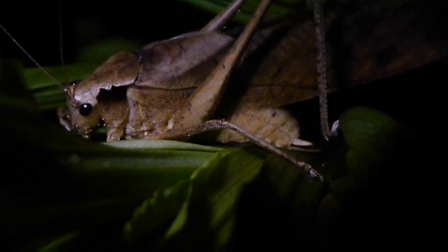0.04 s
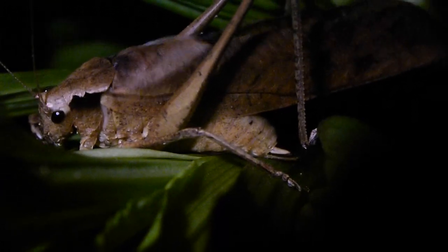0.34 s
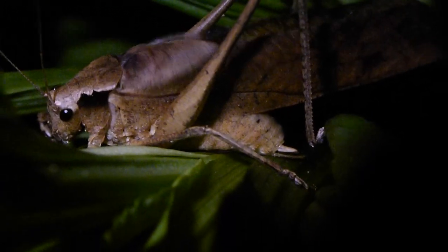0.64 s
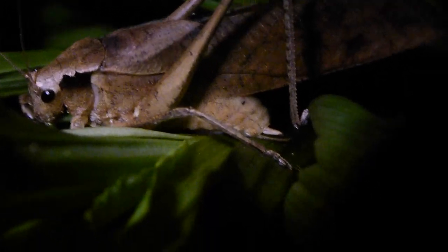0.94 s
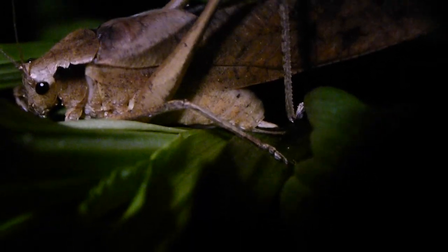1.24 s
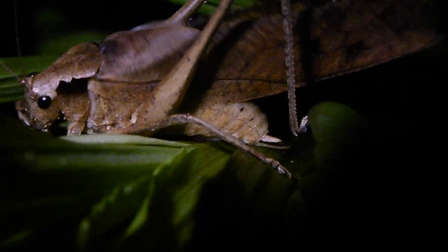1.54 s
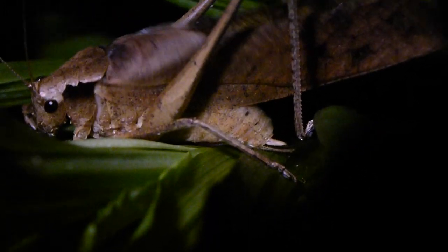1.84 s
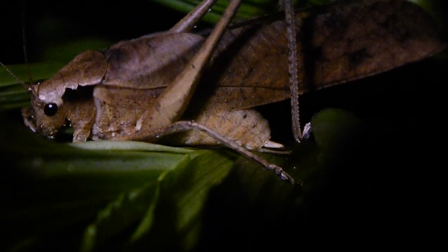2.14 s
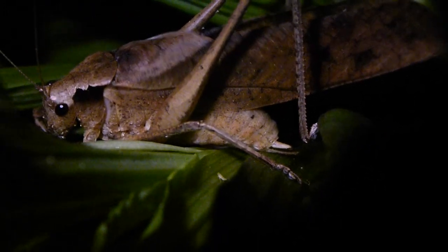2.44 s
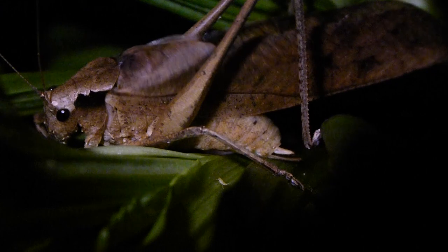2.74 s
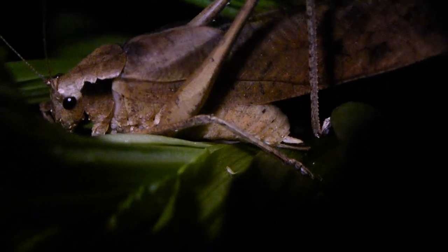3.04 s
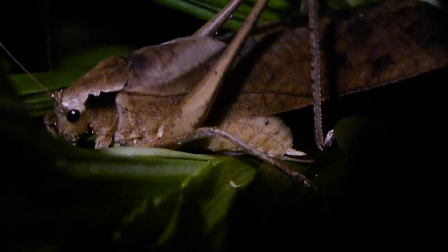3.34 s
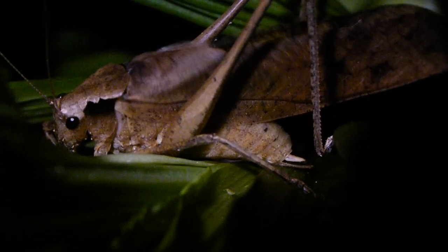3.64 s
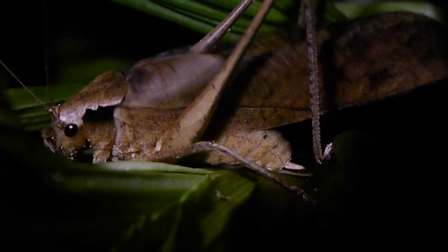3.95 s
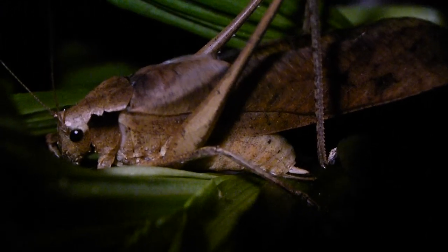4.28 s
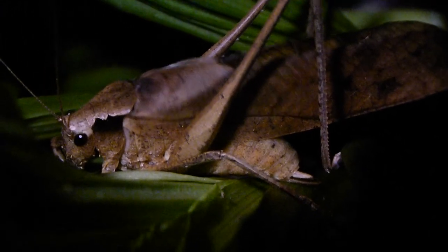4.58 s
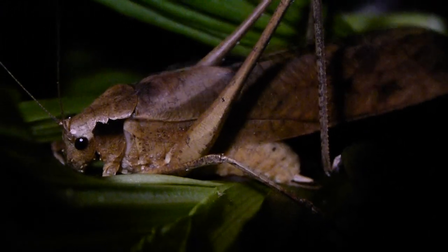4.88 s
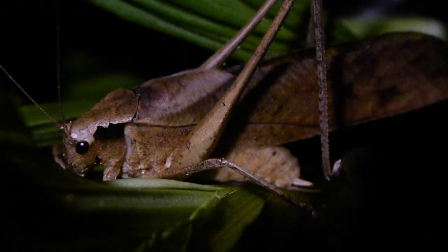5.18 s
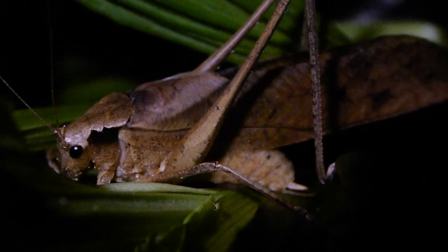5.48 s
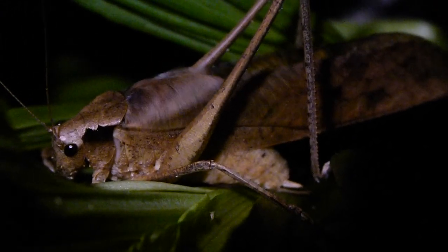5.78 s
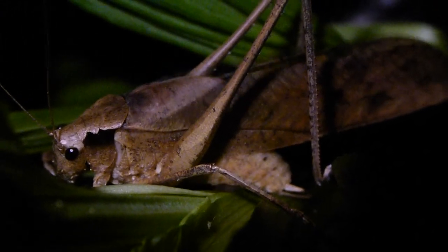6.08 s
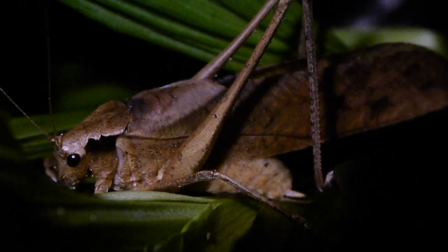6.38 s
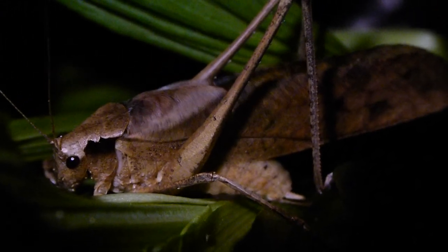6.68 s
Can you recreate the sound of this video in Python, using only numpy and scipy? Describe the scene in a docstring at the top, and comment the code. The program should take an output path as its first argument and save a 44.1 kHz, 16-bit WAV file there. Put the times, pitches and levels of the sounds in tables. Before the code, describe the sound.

A large katydid sings on a leaf close to the microphone, outdoors in foliage at night. Its loud, high-pitched, raspy buzz pulses about fourteen times a second and runs evenly from start to finish, slightly to the right. Distant insects blur into a faint high hiss behind it. A few soft dull knocks and one tiny peep past the middle are barely audible.

```python
"""In foliage at night, a large katydid sings on a leaf close by, about 14 chirps a second.
Each chirp is four ever stronger wing strokes: closing rasps the scraper over the file tooth by tooth,
opening whips it back with a squeak. The teeth ring the wing membrane and the leaves scatter the buzz.
Behind it sit distant insects, still night air, a few soft knocks and one faint peep."""
import sys
import numpy as np
from scipy import signal
from scipy.fft import rfft, irfft, next_fast_len
from scipy.io import wavfile

SR = 44100
rng = np.random.default_rng(int(sys.argv[2]) if len(sys.argv) > 2 else 0)


def int16_out(signal):
    """Quantize to a 16-bit WAV file."""
    q = np.round(np.clip(np.atleast_2d(signal).T, -1, 1) * 32767)
    wavfile.write(sys.argv[1], SR, q.astype(np.int16))


N = 305172


def undb(db):
    """Decibels to gain."""
    return np.exp(np.asarray(db) * (np.log(10) / 20))


def unit(x):
    """Scale to rms 1."""
    return x / np.sqrt(np.mean(x ** 2))


def bell(hz, centre_hz, width_hz):
    """Shape of one resonance, 1 at its centre."""
    return 1 / (1 + (2 * (hz - centre_hz) / width_hz) ** 2)


def colour(points, peaks=(), size=4096):
    """Causal impulse response of a broad EQ curve with peaks and notches on top."""
    hz = np.arange(size // 2 + 1) * SR / size
    point_hz, point_db = np.transpose(points)
    db = np.interp(np.log(hz + 1), np.log(point_hz), point_db)
    db += sum(gain_db * bell(hz, centre, width) for centre, width, gain_db in peaks)
    cepstrum = irfft(np.log(undb(db)))
    cepstrum[1:size // 2] *= 2  # minimum phase: all ringing follows the hit
    cepstrum[size // 2 + 1:] = 0
    return irfft(np.exp(rfft(cepstrum)))


def through(x, response):
    """Pass a sound through an impulse response."""
    return signal.oaconvolve(x, response)[:len(x)]


def lowpass(x, hz, order=1):
    """Round off everything above hz without delaying it."""
    size = next_fast_len(len(x), True)
    f = np.arange(size // 2 + 1) * SR / size
    return irfft(rfft(x, size) / np.sqrt(1 + (f / hz) ** (2 * order)), size)[:len(x)]


def drift(rate_hz):
    """Smooth random movement with a spread near 1."""
    position = np.arange(N) / SR * rate_hz
    count = int(position[-1]) + 2
    return np.interp(position, np.arange(count), rng.standard_normal(count))


def clicks(times, sizes, order=8):
    """Sharp impulses placed between samples by a windowed sinc."""
    at = times[:, None] * SR
    index = np.floor(at).astype(int) + np.arange(1 - order, order + 1)
    window = np.cos(np.pi * (index - at) / (2 * order)) ** 2
    taps = sizes[:, None] * np.sinc(index - at) * window
    inside = (index >= 0) & (index < N)
    return np.bincount(index[inside], taps[inside], N)


# The singer's pace, held until the next row. Each row: start in seconds, chirps per second.
TEMPO = [(-0.009, 14.31), (0.45, 14.17), (1.72, 14.30), (3.95, 13.825), (4.46, 14.08), (5.31, 14.275)]
# How hard it sings. Each row: time in seconds, relative chirp level in dB.
EFFORT = [(0, -14.5), (1.3, -15.5), (3.2, -15.0), (3.7, -15.5), (4.5, -15), (6.2, -14.5), (6.9, -15)]


def chirps(jitter_s=0.0004005, spread_db=0.2):
    """Start and level of every chirp: they follow tempo and effort, each a touch off by chance."""
    since, rate_hz = np.transpose(TEMPO)
    starts = [since[0]]
    while starts[-1] < N / SR:
        starts.append(starts[-1] + 1 / rate_hz[since <= starts[-1]][-1])
    late, louder = rng.standard_normal((len(starts), 2)).T
    effort_db = np.interp(starts, *np.transpose(EFFORT))
    return starts + jitter_s * late, effort_db + spread_db * louder


def stroke(row, trill, tooth_jitter, speed_spread, tooth_db, force_db, slip_ms, fade_share, teeth=80):
    """One wing stroke in every chirp: the scraper hits a run of teeth with uneven spacing and force."""
    delay_ms, length_ms, db, *rate_hz = row
    start, chirp_db = np.array(trill)[:, :, None]
    speed, force, slip = rng.standard_normal((3, len(start), 1))  # vary stroke by stroke
    spacing, bite = rng.standard_normal((2, len(start), teeth))  # vary tooth by tooth
    delay_s, length_s, slip_s = np.array([delay_ms, length_ms, slip_ms]) / 1000
    progress = np.arange(teeth) / (length_s * np.mean(rate_hz))
    tooth_hz = np.interp(progress, [0, .5, 1], rate_hz) * np.exp(speed_spread * speed)
    gaps = np.exp(tooth_jitter * spacing) / tooth_hz
    t = np.cumsum(gaps, axis=1) - gaps[:, :1] / 2
    # the pressure builds as the wings meet and fades as they part
    contact = np.clip(np.minimum(t, length_s - t) / (fade_share * length_s), 0, 1)
    pressure = np.sin(np.pi / 2 * contact)
    sizes = pressure * undb(chirp_db + db + force_db * force + tooth_db * np.tanh(bite))
    times = start + delay_s + slip_s * slip + t
    touching = pressure > 0
    return clicks(times[touching], sizes[touching])


# The four rasps of a chirp. Each row: delay in ms, length in ms, relative level in dB,
# then teeth per second at the start, middle and end.
CLOSING_STROKES = [(2.701, 9.45, -8.5, 2090, 2060, 2080), (16.26, 7.84, -5, 2220, 2200, 2170),
                   (29.8, 9.23, -0.47, 2280, 2150, 2177), (44.4, 10.05, .5, 2190, 2180, 2300)]


def rasp(trill):
    """The wings close, dragging the scraper slowly over the file."""
    return sum(stroke(row, trill, tooth_jitter=0.1135, speed_spread=0.02205, tooth_db=3.0,
                      force_db=.5, slip_ms=0.497, fade_share=0.14) for row in CLOSING_STROKES)


# The squeaks of a chirp; the last two strokes get two each. Each row: delay in ms, length in ms,
# relative level in dB, then teeth per second at the start, middle and end.
OPENING_SQUEAKS = [(12.2, 3.43, -6, 5890, 5850, 4400), (24.73, 4.84, -6.5, 5600, 6000, 6040),
                   (39.8, 3.64, -5.5, 5860, 5770, 6330), (41.57, 3.47, -2, 7600, 8100, 9200),
                   (55.9, 4.77, -1, 13200, 10700, 9350), (58.87, 3.73, -7, 5060, 5370, 7200)]


def squeak(trill):
    """The wings whip open: the scraper rides the gentle side of the teeth, so the blows are softer."""
    blows = sum(stroke(row, trill, tooth_jitter=0.081, speed_spread=0.021, tooth_db=2.5,
                       force_db=1.7, slip_ms=0.398, fade_share=0.39) for row in OPENING_SQUEAKS)
    return lowpass(blows, hz=7360)


# The wing's broad tone when one tooth strikes. Each row: frequency in Hz, gain in dB.
WING_TONE = [(100, -71), (700, -34.5), (1260, -38), (1450, -16), (1950, -21.5), (2500, -15), (3700, -17),
             (5300, -12.5), (5750, 3.5), (6900, -4.5), (8100, -9), (8750, -22), (12000, -18.5),
             (15800, -12)]
# Rings and notches of the wing and its leafy perch. Each row: centre in Hz, width in Hz, gain in dB.
WING_RESONANCES = [(1547, 66, 3), (2180, 430, 2), (3196, 140, -11.5), (3573, 570, 4.5), (4750, 264, 6.5),
                   (5050, 87, 5.5), (5550, 35, 1.5), (5860, 68, 3.5), (6066, 75, 3), (6320, 144, 4),
                   (6490, 233, 6), (6680, 28, 8.5), (6832, 135, 9), (7150, 112, 9), (7500, 41, -1.5),
                   (7580, 120, 7), (9430, 250, 7), (9830, 120, 4.5), (10200, 116, 6.5), (14400, 370, -2.5),
                   (14700, 440, -2)]
# The top of the buzz softens a little partway through. Each row: time in seconds, treble gain in dB.
TREBLE_RIDE = [(0, 0.4), (3.5, 0.6), (4.2, -0.7), (6.9, -0.5)]


def katydid():
    """Rasps and squeaks ring the same wing membrane, which is too small to radiate bass."""
    trill = chirps()
    song = through(rasp(trill) + squeak(trill), colour(WING_TONE, WING_RESONANCES))
    song = signal.sosfilt(signal.butter(3, 330, "high", fs=SR, output="sos"), song)
    body = lowpass(song, hz=7100, order=4)
    treble_db = np.interp(np.arange(N) / SR, *np.transpose(TREBLE_RIDE))
    return undb(19.5) * (body + undb(treble_db) * (song - body))


# The tone of what the leaves throw back. Each row: frequency in Hz, gain in dB.
LEAF_TONE = [(500, 1), (2200, 1), (4500, 2.5), (6500, 0), (9800, 4.5), (12000, 1), (16000, -2)]


def leaf_scatter(decay_s, wet_db, build_ms, size=8192):
    """Impulse response of many small reflections from leaves, building up and dying away."""
    t = np.arange(size) / SR
    envelope = 1000 ** (-t / decay_s) * (1 - np.exp(-1000 * t / build_ms))
    spectrum = rfft(rng.standard_normal(size) * envelope)
    tail = irfft(spectrum / np.abs(spectrum)) * np.sqrt(envelope)  # flattened so no pitch stands out
    return undb(wet_db) * through(tail / np.linalg.norm(tail), colour(LEAF_TONE))


def perch_echoes(song):
    """Leaves around the singer throw the buzz back; as they sway, one pattern melts into another."""
    first, second = (through(song, leaf_scatter(decay_s=0.095, wet_db=-11.0, build_ms=0.73))
                     for _ in range(2))
    sway = 1.42 * drift(1.508)
    return np.cos(sway) * first + np.sin(sway) * second


# The wing beams each pitch its own way. Each row: frequency in Hz, left minus right in dB,
# phase lead of the left in radians.
WING_BEAM = [(1500, -1.5, 0.2), (2280, -2.5, 0.26), (4040, 3, 1), (5060, -4, -0.26), (5920, -0.5, 0.68),
             (6800, -5, 0.38), (7760, -1, 0), (8270, -2, -1.5), (8600, 1, 1.5), (9800, -3, 0.92),
             (11930, 13, 1.5), (13300, -2.5, -3.5), (14500, 2.5, 1), (15800, 1, -0.5)]


def beam_and_thicket(side, size=8192):
    """Response from the singer to the left (1) or right (-1): direct beam plus the wider thicket."""
    hz = np.arange(size // 2 + 1) * SR / size
    beam_hz, *columns = np.transpose(WING_BEAM)
    balance_db, lead = (np.interp(hz, beam_hz, column) for column in columns)
    travel = np.exp(-2j * np.pi * hz / 1000)  # 1 ms of delay
    beam = irfft(undb(side * balance_db / 2) * np.exp(1j * side * lead / 2) * travel)
    return beam + leaf_scatter(decay_s=0.21, wet_db=-13.0, build_ms=1.16)


# The insect bed. Each row: centre in Hz, width in Hz, level in dB, throbs per second.
INSECT_BANDS = [(6820, 1350, -30, 19), (9200, 770, -58, 57)]


def distant_insects(throb_db=1.3):
    """Far insects blur into narrow bands of buzz, each throbbing at its own drifting rate."""
    bed = 0
    for centre_hz, width_hz, db, rate_hz in INSECT_BANDS:
        edges_hz = [centre_hz - width_hz / 2, centre_hz + width_hz / 2]
        band = signal.butter(2, edges_hz, "band", fs=SR, output="sos")
        buzz = unit(signal.sosfilt(band, rng.standard_normal((2, N))))
        throb_hz = rate_hz * (1 + 0.033 * drift(1.98))
        throb = np.sin(2 * np.pi * np.cumsum(throb_hz) / SR)
        bed = bed + buzz * undb(db + throb_db * throb)
    return bed


# The tone of the night air. Each row: frequency in Hz, relative level in dB.
AIR_TONE = [(20, -15), (60, -15), (150, -12.5), (350, -10), (600, -7), (1050, 1.5), (1300, -9), (2500, -39)]


def night_air(gain_db=-75, flutter_db=2):
    """A very quiet, uneven low rustle, partly shared by both sides."""
    tone = colour(AIR_TONE)
    shared, left, right = (unit(through(rng.standard_normal(N), tone)) for _ in range(3))
    return undb(gain_db + flutter_db * drift(27)) * (.5 * shared + np.array([left, right]))


# Faint soft knocks close by. Each row: start in seconds, gain in dB.
KNOCKS = [(0.52, -60), (1.728, -63), (2.213, -64), (4.755, -64), (5.674, -62), (6.222, -66)]
# Their dull tone. Each row: frequency in Hz, relative level in dB.
KNOCK_TONE = [(30, -4), (150, -2), (500, 0), (900, -3), (1500, -20)]


def knocks(attack_s=.003, decay_s=.012):
    """Each knock is a dull puff that rises quickly and dies away."""
    t = np.arange(N) / SR
    envelope = 0
    for start, db in KNOCKS:
        age = np.maximum(t - start, 0)
        envelope = envelope + undb(db) * (1 - np.exp(-age / attack_s)) * np.exp(-age / decay_s)
    return envelope * unit(through(rng.standard_normal(N), colour(KNOCK_TONE)))


# One faint peep from further off: start in seconds, length in seconds, pitch in Hz, level in dB.
PEEP = (4.744, .042, 815, -53)


def peep():
    """A short, soft, slightly wavering note."""
    start, length, hz, db = PEEP
    swell = np.sin(np.pi * np.clip((np.arange(N) / SR - start) / length, 0, 1))
    pitch_hz = hz * (1 + .06 * drift(300))
    return undb(db) * swell * unit(np.sin(2 * np.pi * np.cumsum(pitch_hz) / SR))


def scene():
    """The singer sits up front among leaves, a little to the right, over the quiet night bed."""
    song = katydid()
    song = song + perch_echoes(song)
    near = np.array([through(song, beam_and_thicket(side)) for side in (1, -1)])
    return near + distant_insects() + night_air() + peep() + knocks()


def record(dry):
    """A steep low-pass takes the very top off the mix."""
    top_hz = 15750
    return signal.sosfilt(signal.ellip(10, .05, 60, top_hz, fs=SR, output="sos"), dry)


dry = scene()
out = record(dry)
int16_out(out)
```